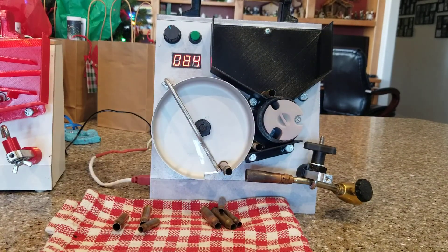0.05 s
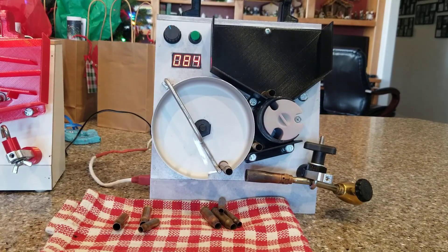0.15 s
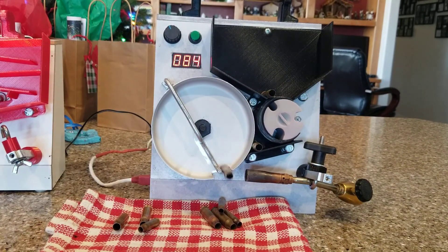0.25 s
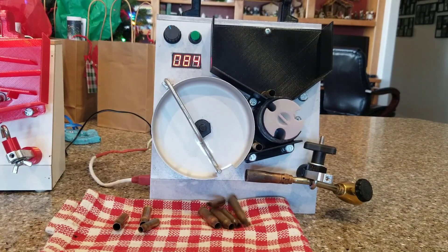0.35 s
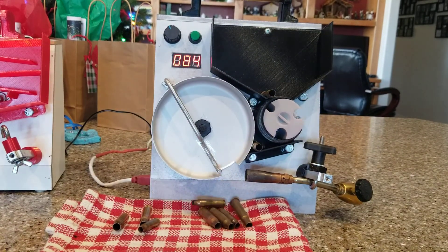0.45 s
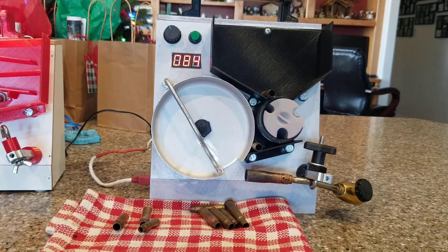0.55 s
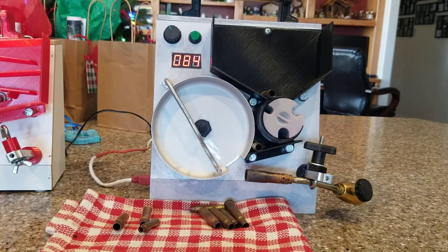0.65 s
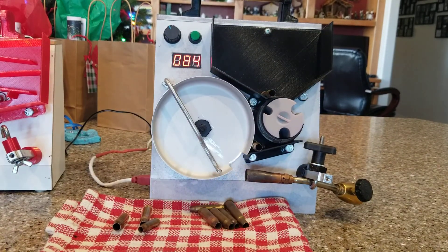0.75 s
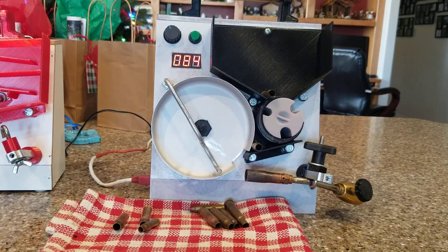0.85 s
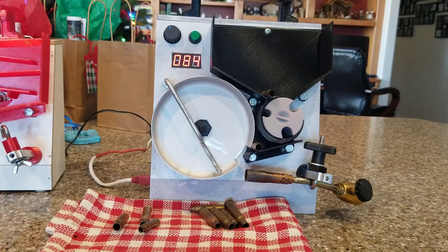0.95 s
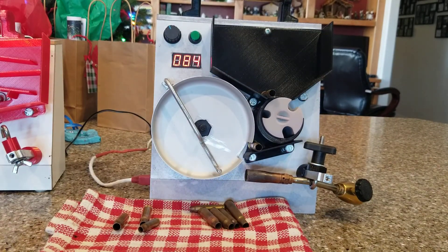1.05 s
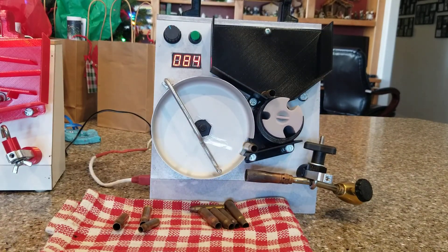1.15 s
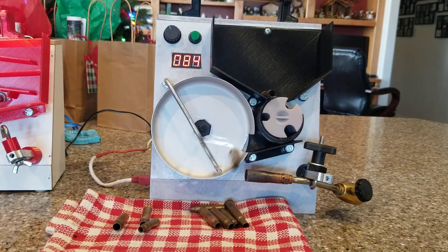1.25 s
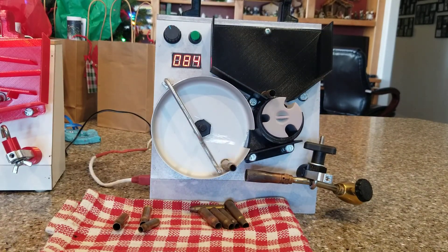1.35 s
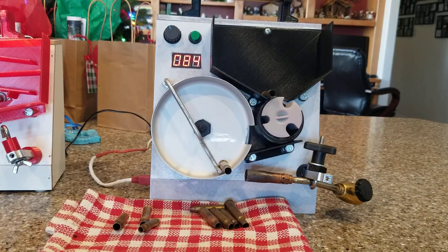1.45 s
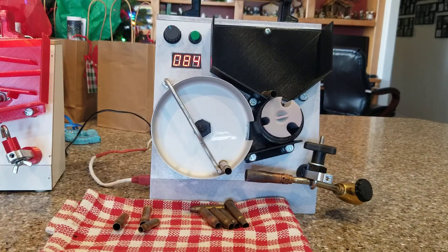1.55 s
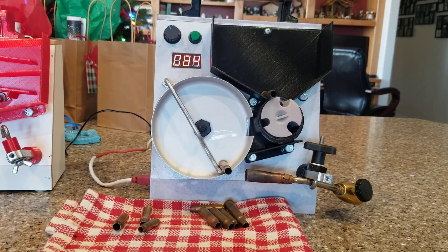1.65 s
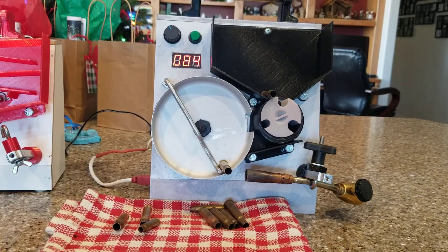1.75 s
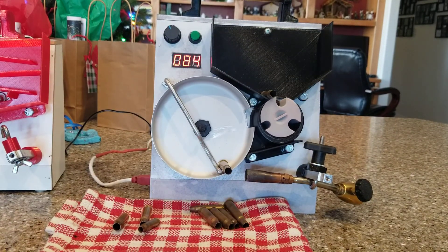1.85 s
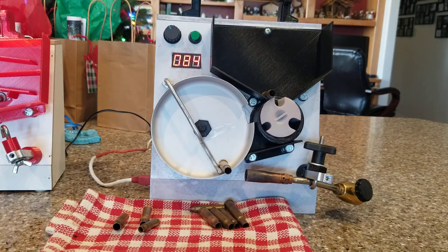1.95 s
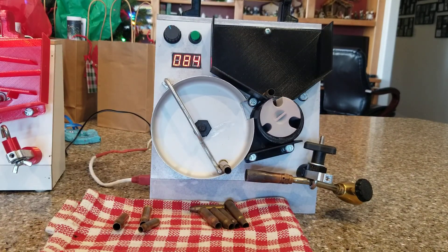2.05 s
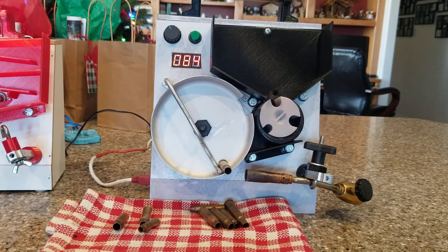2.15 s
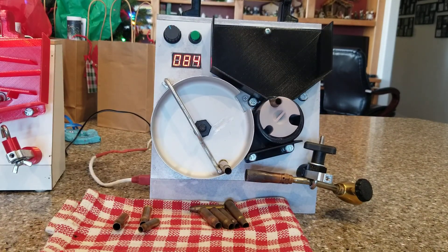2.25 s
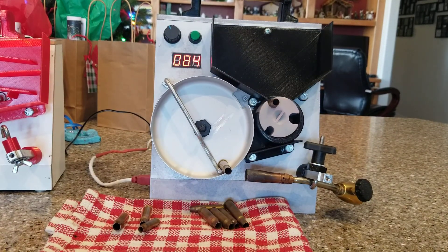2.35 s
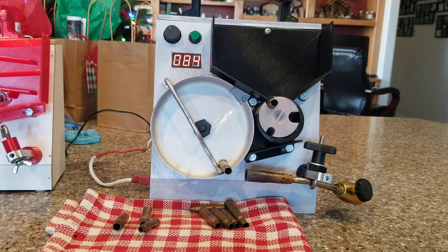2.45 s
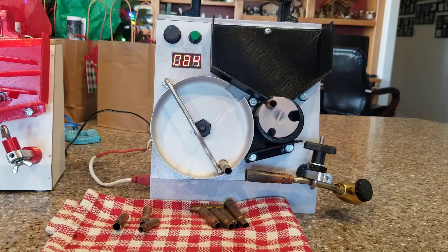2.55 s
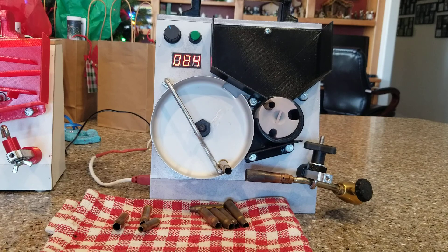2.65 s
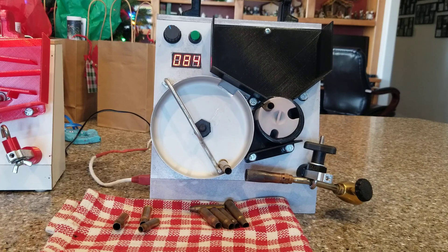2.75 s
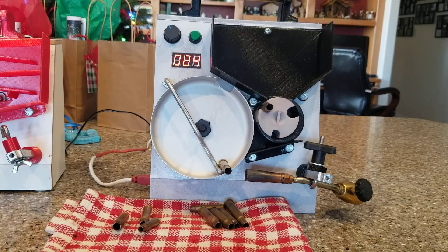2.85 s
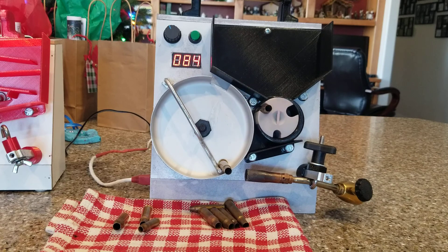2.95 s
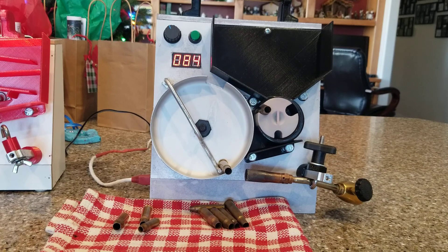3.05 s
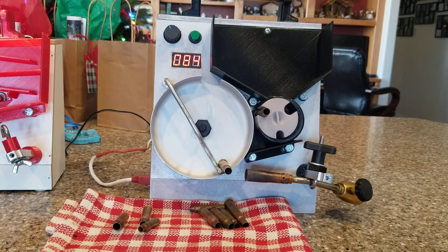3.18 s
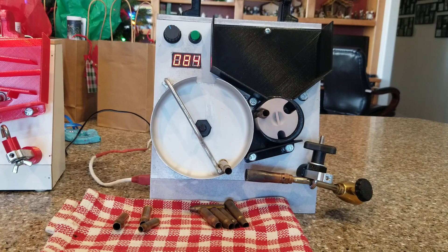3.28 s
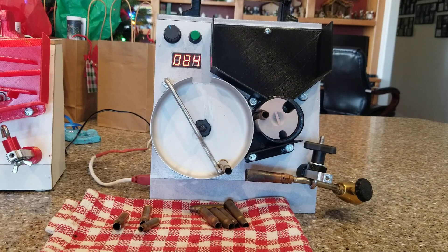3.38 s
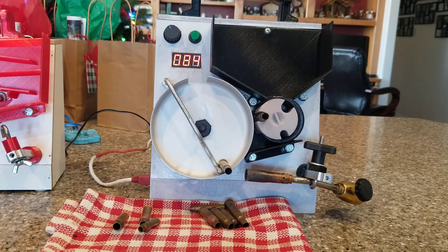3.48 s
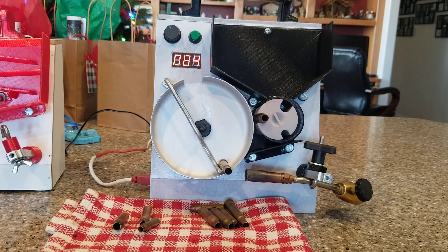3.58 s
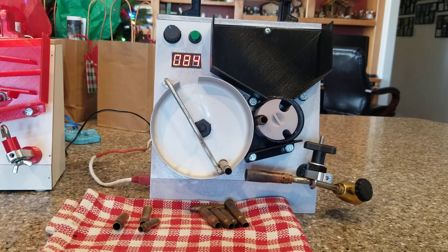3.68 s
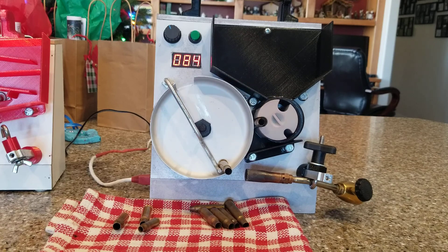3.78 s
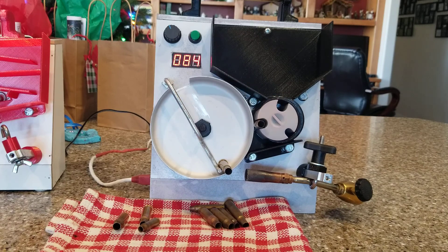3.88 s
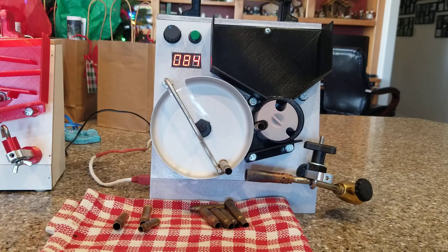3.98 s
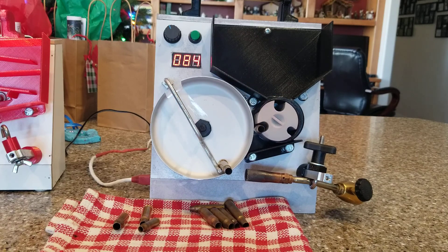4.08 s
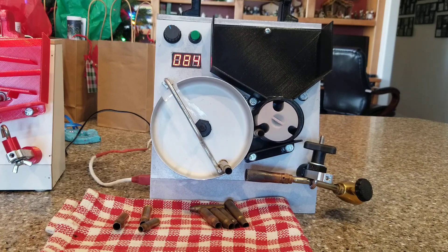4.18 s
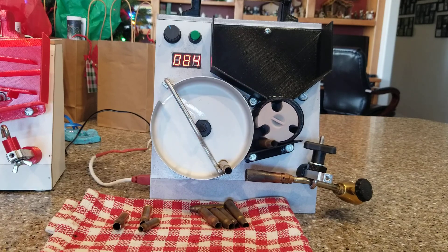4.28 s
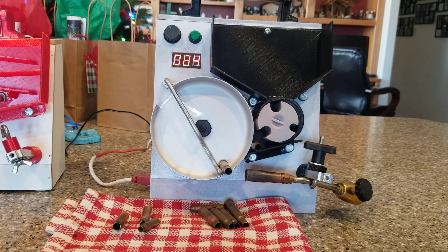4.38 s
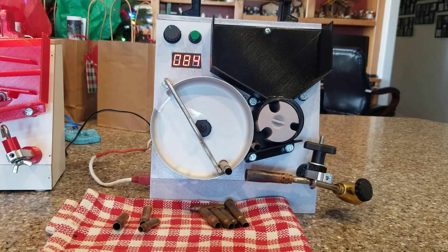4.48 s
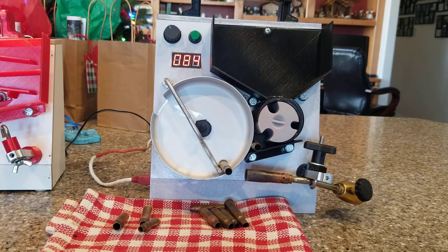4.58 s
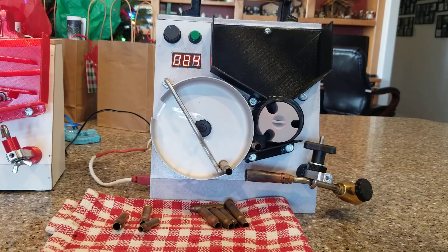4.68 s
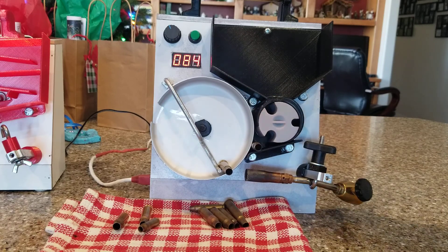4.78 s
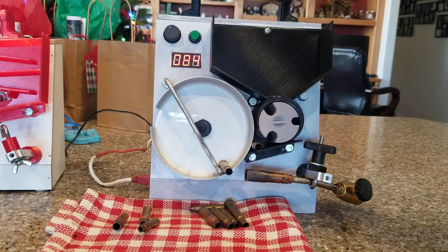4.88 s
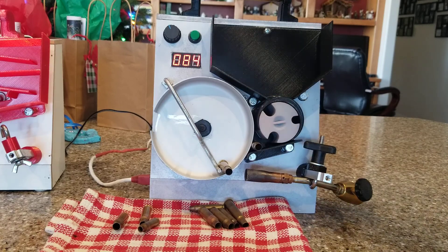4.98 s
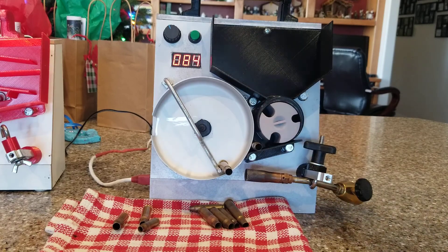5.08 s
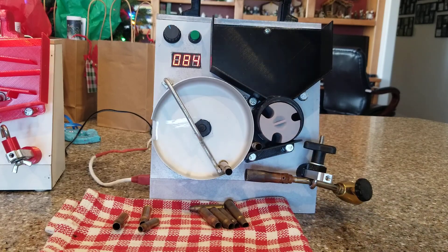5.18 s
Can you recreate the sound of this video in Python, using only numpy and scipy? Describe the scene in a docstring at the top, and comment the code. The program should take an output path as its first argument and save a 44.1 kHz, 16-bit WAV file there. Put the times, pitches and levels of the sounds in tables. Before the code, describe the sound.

A small motorised machine runs on a stone counter in a living room, giving a quiet, slightly uneven gear whir with a thin whine near 1.2 kHz over low rumble. At about 0.3 s an empty brass case lands with a soft thud on a towel and clinks against the pile, very high and bright, with tiny hollow taps by 0.55 s. From 1.1 to 1.45 s another drops with sharp snaps and rattles rapidly in the metal drum, ringing strongly with a brief low boom. The motor's tone shifts slightly; faint rubbing rings follow. Near 2.2 s a lighter click and ting settle in the feed wheel, then a tiny squeak around 2.4 s. Motor alone until a knock at 3.8 s brings soft hiss, followed by a short steel clatter from 4.15 to 4.5 s. Dull bumps and growing rumble close it. Bright sounds lean right; the room reverberates lightly.

```python
"""Case annealer on a counter

A small case annealer runs on a stone counter in a living room: coloured noise and tones make its gear motor,
over a low noise rumble that grows at the end as the phone that hears it is moved. A brass case drops onto a
towel and clinks against the pile; the next rattles into the drum, another settles in the feed wheel. Later
comes a short clatter with a soft hiss. Knocks are shaped bursts of noise, and ringing metal is a set of
fading sines. The bright sounds reach the right microphone far more than the left."""
import sys
import numpy as np
from scipy import signal
from scipy.fft import rfft, irfft, next_fast_len
from scipy.io import wavfile

SR = 44100
rng = np.random.default_rng(int(sys.argv[2]) if len(sys.argv) > 2 else 0)


def persist_wave(psi):
    """Save psi, clipped to +-1, as 16-bit WAV."""
    counts = np.round(np.clip(psi, -1, 1) * 32767).astype(np.int16)
    wavfile.write(sys.argv[1], SR, np.atleast_2d(counts).T)


N = 230591
TIME = np.arange(N) / SR


def from_db(db):
    """Turn decibels into a gain."""
    return 10 ** (np.asarray(db) / 20)


def rms_one(x):
    """Scale a sound to an rms level of 1."""
    return x / np.sqrt(np.mean(x ** 2) + 1e-20)


def at_hz(points, hz):
    """Read a (frequency, value) table on a log-frequency axis."""
    table_hz, values = np.transpose(points)
    return np.interp(np.log(hz), np.log(table_hz), values)


def fading(t, t60):
    """Exponential decay that loses 60 dB in t60 seconds."""
    return np.exp(-np.log(1000) * t / max(t60, 1e-3))


def swell(start, attack_s, end, t60):
    """An envelope that rises from start, holds until end, then dies away."""
    rise = np.clip((TIME - start) / max(attack_s, 1e-3), 0, 1)
    return rise * fading(np.maximum(TIME - end, 0), t60)


def wander(per_s, t):
    """A random curve, with per_s random points a second joined by straight lines."""
    knots = rng.standard_normal(int(t[-1] * per_s) + 2)
    return np.interp(t * per_s, np.arange(len(knots)), knots)


def band(x, low_hz, high_hz, order=2):
    """Keep only the sound between two frequencies."""
    edges = [low_hz, min(high_hz, .48 * SR)]
    return signal.sosfilt(signal.butter(order, edges, "band", fs=SR, output="sos"), x + 1e-18)


def resonate(x, hz, width):
    """A resonance at hz, with gain close to 1 on top and a width in Hz."""
    r = np.exp(-np.pi * width / SR)
    feed = np.array([1, 0, -1]) * (1 - r * r) / 2
    feedback = [1, -2 * r * np.cos(2 * np.pi * hz / SR), r * r]
    return signal.lfilter(feed, feedback, x + 1e-18)


def add(track, s, sound):
    """Mix a sound into a track at a time in seconds."""
    start = int(s * SR)
    track[start:start + len(sound)] += sound[:N - start]


def colour(x, gain):
    """Apply a gain that is a function of frequency."""
    size = next_fast_len(N)
    hz = np.maximum(np.arange(size // 2 + 1) * SR / size, 1)
    return irfft(rfft(x, size) * gain(hz), size)[..., :N]


def shaded(pair, shade):
    """Give the left microphone its own tone, and let it hear 0.1 ms later than the right."""
    left = colour(pair[0], lambda hz: from_db(at_hz(shade, hz)) * np.exp(-2j * np.pi * hz * 1e-4))
    return np.array([left, pair[1]])


def steady_noise(spectrum):
    """Coloured stereo noise, most alike at both microphones in the bass; rms 1."""
    # left-right likeness, with values below zero treated as zero: (frequency [Hz], correlation [-1 to 1])
    likeness = [(60, 0.95), (180, 0.65), (550, 0.15), (1650, -0.23), (4970, -0.07), (15000, -0.27)]

    def alike(hz):
        """Likeness at a frequency, kept between 0 and 0.99."""
        return np.clip(at_hz(likeness, hz), 0, .99)

    mid, side = rng.standard_normal((2, N))
    mid = colour(mid, lambda hz: from_db(at_hz(spectrum, hz)) * np.sqrt(1 + alike(hz)))
    side = colour(side, lambda hz: from_db(at_hz(spectrum, hz)) * np.sqrt(1 - alike(hz)))
    return rms_one(np.array([mid + side, mid - side]))


def room(x, wet_db, early_db, left_direct_db, shared_below_hz=700):
    """Direct sound, quick reflections off counter and panels, then the room's tail; the bass is mostly shared."""
    # how long the room rings: (frequency [Hz], time to lose 60 dB [s])
    room_t60 = [(100, 0.48), (500, 0.56), (3000, 0.61), (8000, .42), (15000, 0.13)]
    early_t60 = .09  # s
    t = TIME[:SR * 3 // 5]
    edges = np.geomspace(50, 20000, 10)
    response = np.zeros((2, len(t)))
    for low, high in zip(edges, edges[1:]):
        hz = np.sqrt(low * high)
        own = 1 / (1 + (shared_below_hz / hz) ** 2)  # share of power that differs between the sides
        noise = np.sqrt(own) * rng.standard_normal((2, len(t)))
        noise += np.sqrt(1 - own) * rng.standard_normal(len(t))
        decay = from_db(wet_db) * rms_one(fading(t, at_hz(room_t60, hz)))
        decay += from_db(early_db) * rms_one(fading(t, early_t60))
        # reflections start 2 ms after the direct sound
        response += band(noise * decay * (t > .002), low, high) / np.sqrt(len(t))
    direct = x * from_db([[left_direct_db], [0]])
    return direct + signal.fftconvolve(x[None], response, axes=1)[:, :N]


def motor_and_rumble(waver=0.0016, flutter_db=1.06, shift_s=1.5):
    """Gear noise, whine and tones of the motor, over a low rumble that grows as the phone is moved.

    The tones shift about 1.5 s, soon after the case drops into the drum."""
    # colours of the gear noise and of the rumble: (frequency [Hz], relative density [dB per Hz])
    running_spectrum = [(100, -37.5), (160, -14.5), (270, -12.5), (370, 0), (480, -6.5), (700, -3.5),
                        (950, -10), (1300, -8), (2100, -12.5), (3000, -29), (4200, -21.5), (6500, -31.5),
                        (9000, -27.5), (11500, -23.5), (16000, -28.5)]
    rumble_spectrum = [(20, -25.5), (45, -8), (75, -2.5), (115, -1.5), (160, -11), (230, -7), (400, -28.5),
                       (1500, -77.5)]
    # motor speed, as the pitch of the gear whine: (time [s], frequency [Hz])
    speed = [(1.1, 1179), (2.6, 1228), (3.1, 1242), (4.1, 1248), (4.7, 1214)]
    # motor tones, each filtered twice, before and after the shift:
    # (frequency [Hz], width of each filter [Hz], level before [dB], level after [dB])
    hum = [(328.96, 19, -78, -66), (474.3, 14, -69, -71), (862, 14, -84, -71.5), (1860, 32, -76.5, -88),
           (2966, 460, -76, -71.5), (1900, 170, -77, -76.5)]
    gears_db, rumble_start_db, base_whine_db = -60.5, -71, -72
    rumble_grows_s, rumble_db_per_s = 4.7, 13  # the phone is moved towards the end
    panel_hz, panel_width_hz, panel_lift_db = 1246, 9, 9  # the whine grows near a resonance of the panel

    rumble_db = rumble_start_db + rumble_db_per_s * np.maximum(TIME - rumble_grows_s, 0)
    out = from_db(gears_db) * steady_noise(running_spectrum)
    out += from_db(rumble_db) * steady_noise(rumble_spectrum)

    pitch = np.interp(TIME, *np.transpose(speed))
    whine_db = base_whine_db + panel_lift_db / (1 + ((pitch - panel_hz) / panel_width_hz) ** 2)
    wobble = rms_one(band(rng.standard_normal(N), 12, 40))
    turns = np.cumsum(pitch * (1 + waver * wobble)) / SR
    out += from_db(whine_db) * np.sqrt(2) * np.sin(2 * np.pi * turns)
    # the teeth mesh unevenly; the rumble flutters along with the gears
    out *= from_db(flutter_db * rms_one(band(rng.standard_normal(N), 8, 60)))

    shifted = np.clip((TIME - shift_s) * 2 + .5, 0, 1)  # a half-second change centred on shift_s
    for hz, width, before_db, after_db in hum:
        tone = resonate(resonate(rng.standard_normal(N), hz, width), hz, width)
        throb_db = 2.5 * rms_one(band(rng.standard_normal(N), 4, 16))
        level_db = before_db + (after_db - before_db) * shifted
        out += from_db(level_db) * rms_one(tone * from_db(throb_db))
    return out


def hiss(flutter_db=0.5):
    """Bright noise that surges, flutters a little and slowly ebbs."""
    # surges of soft hiss around the clatter: (time [s], level [dB], attack [s], time to lose 60 dB [s])
    surges = [(3.79, -51, 0.01, 2.3), (4.068, -51.5, 0.044, 9.3)]
    # colour of the hiss: (frequency [Hz], relative density [dB per Hz])
    hiss_spectrum = [(250, -3), (380, 9), (900, 0.5), (2000, 2), (4000, -5), (7000, -9), (10000, -10.5),
                     (13000, 0), (16000, -12)]
    level = sum(from_db(db) * swell(s, attack_s, s + attack_s, t60) for s, db, attack_s, t60 in surges)
    return level * from_db(flutter_db * wander(30, TIME)) * steady_noise(hiss_spectrum)


def bumps(t60=0.2):
    """Soft shoves through the counter reach the microphones as a short low rumble."""
    # dull bumps: (time [s], level before the fade [dB])
    shoves = [(0.07, -55), (4.102, -75), (4.605, -52), (4.638, -56), (4.892, -59), (5.07, -48.5),
              (5.142, -58), (5.19, -53)]
    t, out = TIME[:SR // 3], np.zeros(N)
    for s, db in shoves:
        rumble = band(rng.standard_normal(len(t)), 37, 97)
        rumble += from_db(-5.5) * band(rng.standard_normal(len(t)), 118, 280)
        add(out, s, from_db(db) * rms_one(rumble) * fading(t, t60))
    return out


def boom():
    """Two low modes of the drum swell while the case rocks in it."""
    # low modes of the drum: (frequency [Hz], level [dB], attack [s], time to lose 60 dB [s])
    boom_modes = [(92.6, -41, .045, 0.18), (321, -43, 0.0094, 0.42)]
    rock_start_s, rock_end_s = 1.302, 1.435
    out = np.zeros(N)
    for hz, db, attack_s, t60 in boom_modes:
        envelope = swell(rock_start_s, attack_s, rock_end_s, t60)
        out += np.sqrt(2) * from_db(db) * envelope * np.sin(2 * np.pi * hz * TIME)
    return out


def rubs(attack_s=0.01442, t60=.25, hz=4156, width_hz=25):
    """The case rubs on the turning drum: friction keeps one mode of it faintly ringing."""
    # rubs: (time [s], level [dB], length [s])
    rub_times = [(1.801, -83, 0.088), (1.99, -74.5, .1), (2.108, -66, .06), (2.46, -78.5, 0.052)]
    level = sum(from_db(db) * swell(s, attack_s, s + length, t60) for s, db, length in rub_times)
    return level * rms_one(resonate(rng.standard_normal(N), hz, width_hz))


def squeaks(start_hz=13800, end_hz=10800):
    """Brass slips on the feed wheel with a tiny falling chirp, roughened by noise."""
    # squeaks: (time [s], level [dB], length [s])
    slips = [(2.431, -47.5, 0.01), (2.538, -58.5, 0.0031), (2.576, -61, 0.0036)]
    out = np.zeros(N)
    for s, db, length in slips:
        t = TIME[:int(length * SR)]
        chirp = signal.chirp(t, start_hz, length, end_hz) + 0.38 * rng.standard_normal(len(t))
        add(out, s, from_db(db) * np.hanning(len(t)) * chirp)
    return band(out, 8900, 16000)


def hollow_taps(hz=1700, t60=0.0395):
    """Light taps sound the air inside an empty case, which is a short stopped pipe."""
    # taps: (time [s], level [dB])
    taps = [(0.513, -50), (0.543, -44.5), (0.561, -53)]
    t, out = TIME[:SR // 5], np.zeros(N)
    for s, db in taps:
        add(out, s, from_db(db) * np.sin(2 * np.pi * hz * t) * fading(t, t60))
    return out


def thuds(contact_s=0.0008, ring_db=7.5):
    """The towel softens the landing to one smooth push; the counter top answers briefly."""
    # cases landing softly on the towel: (time [s], level of the push [dB])
    landings = [(0.2905, -21.5), (1.113, -44), (1.141, -37), (1.155, -43.5)]
    push, t = np.zeros(N), TIME[:SR // 100]
    for s, db in landings:
        add(push, s, from_db(db) * np.sin(np.pi * np.minimum(t / contact_s, 1)) ** 2)
    knock = from_db(4) * band(push, 420, 1400)
    counter = sum(resonate(knock, hz, 35) for hz in (417.0, 514.3, 692.0, 803.0))
    return knock + from_db(ring_db) * counter


def snaps(t60=0.0113, low_hz=1100):
    """Metal meets a hard stop: a bright broadband crack, gone in about a hundredth of a second."""
    # sharp snaps: (time [s], level before filtering [dB])
    stops = [(1.1997, -23.5), (1.2647, -20.5), (2.226, -31.5), (4.2872, -24.5), (4.3655, -38),
             (4.492, -29.5)]
    t, out = TIME[:SR // 20], np.zeros(N)
    for s, db in stops:
        add(out, s, from_db(db) * rng.standard_normal(len(t)) * fading(t, t60))
    return band(out, low_hz, 16000) + band(out, 1500, 6800)


def touches(count=3, rebound_s=.021, rebound_softens_db=3):
    """Each blow rebounds, softer every time: yields time, level, hardness, knock Hz and clack Hz."""
    # blows on the machine: (time [s], level [dB], hardness [dB], knock centre [Hz], clack centre [Hz],
    # loss per rebound [dB])
    blow_table = [(1.2005, -30, 11.5, 595, 5400, 8.5), (1.2078, -30, 9, 404, 2150, 12),
                  (1.247, -32, 5, 680, 1620, 2), (1.2635, -24.5, 6.5, 690, 1860, 1),
                  (1.2884, -29.5, 0, 680, 2020, 7), (1.309, -25.5, -3, 420, 2190, 9),
                  (1.3323, -28.5, 6.5, 403, 1400, 8), (1.3885, -29, 2.5, 571, 1201, 2.5),
                  (1.4225, -37, -3, 380.5, 1900, 5), (2.1813, -31.5, -9.5, 422, 1795, 8.5),
                  (2.2268, -34, -4.5, 333, 1840, 10), (3.7954, -36.5, 8, 600, 1400, 6),
                  (4.148, -40.5, 5.5, 556, 1140, 9), (4.2359, -35.5, -1.5, 653, 1210, 7),
                  (4.248, -29.5, -1, 680, 1510, 5), (4.2861, -22, -4, 667, 1360, 10),
                  (4.3665, -37, 9.5, 560, 1200, 6), (4.385, -29, -1.5, 367, 2510, 6.5),
                  (4.4924, -34.5, 8, 756, 1180, 14)]
    for s, db, hardness_db, knock_hz, clack_hz, loss_db in blow_table:
        for k, uneven in enumerate(rng.standard_normal(count)):
            touch_s = s + k * rebound_s * (1 + .06 * uneven)
            yield touch_s, db - k * loss_db, hardness_db - k * rebound_softens_db, knock_hz, clack_hz


def blows(tick_db=-8, knock_db=7, low_db=-4, clack_db=4.5, crack_db=6, crack_t60=0.0074, chatter_t60=.068,
          grain_db=4, knock_spread=1.62, clack_spread=1.6, knock_loss_per_db=.5):
    """Each touch is a crack and a chatter of tiny contacts, coloured by hardness and housing resonances."""
    # resonances of the housing: (frequency [Hz], width [Hz], level [dB])
    housing_modes = [(94, 15, 7.5), (205, 45, -1), (344.2, 18, 13), (432.6, 40.1, -1), (533.8, 30, -1.5),
                     (722, 34, 8), (830.5, 9.8, 8.5), (1217, 73, 6.5), (1474.3, 70, 1), (2030, 85, -0.5),
                     (2922, 70, 3), (4156, 250, -9), (5612, 370, -3.5)]
    t = TIME[:SR // 4]
    tick, body = np.zeros((2, N))
    for s, db, hardness_db, knock_hz, clack_hz in touches():
        noise, grains = rng.standard_normal((2, len(t)))
        envelope = from_db(crack_db) * fading(t, crack_t60) + fading(t, chatter_t60)
        force = rms_one(noise * from_db(grain_db * grains)) * envelope
        knock = from_db(knock_db) * band(force, knock_hz / knock_spread, knock_hz * knock_spread)
        knock += from_db(low_db) * band(force, 70, 200)
        clack = from_db(clack_db) * band(force, clack_hz / clack_spread, clack_hz * clack_spread)
        # a harder touch ticks more and knocks less
        add(tick, s, from_db(db + tick_db + hardness_db) * force)
        add(body, s, from_db(db - knock_loss_per_db * hardness_db) * knock + from_db(db) * clack)
    housing = sum(from_db(db) * resonate(body, hz, width) for hz, width, db in housing_modes)
    bright = band(tick, 9300, 15000, order=3) + from_db(0.5) * band(tick, 3300, 5400)
    return from_db(-3.5) * body + housing + bright


def ringing_metal(clinks, modes, contact_db, contact_t60, swing_db=2.0, phase_wander=0.74, pivot_hz=11000):
    """A touch makes a brief contact hiss and feeds energy into each ringing mode."""
    start, end = clinks[0][0], clinks[-1][0]
    t, short = TIME[:int((end - start + .5) * SR)], TIME[:SR // 2]
    out, contact = np.zeros((2, N))
    for hz, mode_db, t60 in modes:
        energy = np.zeros(len(t) + SR)
        decay = fading(short, t60) ** 2
        for s, level_db, tilt_db in clinks:
            hit_db = level_db + mode_db + tilt_db * np.log2(hz / pivot_hz)
            add(energy, s - start, from_db(hit_db) ** 2 * decay)
        # the part turns as it rings, so each mode swells and fades on its own
        swing, phase = wander(45, t), wander(70, t)
        tone = np.sin(2 * np.pi * hz * t + phase_wander * phase)
        add(out, start, np.sqrt(energy[:len(t)]) * from_db(swing_db * swing) * tone)
    for s, level_db, _ in clinks:
        burst = rng.standard_normal(len(short)) * fading(short, contact_t60)
        add(contact, s, from_db(level_db + contact_db) * burst)
    return out + band(contact, 8200, 11000) + from_db(-15.5) * band(contact, 2500, 4900)


def steel_rings():
    """A steel part of the machine jangles in the clatter."""
    # clinks: (time [s], level [dB], tilt [dB per octave])
    steel_clinks = [(3.795, -34, 6.5), (4.287, -47, 2), (4.368, -32, 4.5), (4.386, -41, 6),
                    (4.402, -29.5, 13), (4.492, -47, 8)]
    # ring of the part: (frequency [Hz], level [dB], time to lose 60 dB [s])
    steel_modes = [(1240, -2, .14), (1340, -2, .12), (2075, -3, .12), (2600, -5, .13), (2953, -2, .12),
                   (3490, -7, .1), (3919, -6, .15), (4434, -5, .13), (5450, -8, .11), (6191, -7, .11),
                   (8370, -11, .13), (13400, -11, .1)]
    return ringing_metal(steel_clinks, steel_modes, contact_db=-9, contact_t60=0.02112)


def feed_rings():
    """A brass case rings as it settles in the feed wheel."""
    # clinks: (time [s], level [dB], tilt [dB per octave])
    feed_clinks = [(2.182, -43, 11.5), (2.226, -42, -2)]
    # ring of the case there: (frequency [Hz], level [dB], time to lose 60 dB [s])
    feed_modes = [(2584, -20, .12), (8441, 0, .22), (8893, -11, .12), (11210, -2, .19), (14600, -11, .13)]
    return ringing_metal(feed_clinks, feed_modes, contact_db=15, contact_t60=.015)


def pile_rings():
    """Brass clinks on brass in the pile."""
    # clinks: (time [s], level [dB], tilt [dB per octave])
    pile_clinks = [(0.3225, -19.5, 1), (0.334, -21, 8), (0.372, -24.5, -5), (0.407, -31, 8),
                   (0.427, -38, 6), (0.447, -31.5, 6), (0.512, -36, 40), (0.545, -47, 2)]
    # ring of the cases there: (frequency [Hz], level [dB], time to lose 60 dB [s])
    pile_modes = [(7860, -5, .28), (9970, -13, .12), (10340, -3.5, .2), (11435, -12, .33), (11470, -6, .32),
                  (12530, -15, .1), (12840, -15, .24), (13600, -9, .14), (15280, -1, .135),
                  (15460, -11, .17)]
    return ringing_metal(pile_clinks, pile_modes, contact_db=-5.5, contact_t60=0.107)


def drum_rings():
    """A brass case rings as it bounces in the drum."""
    # clinks: (time [s], level [dB], tilt [dB per octave])
    drum_clinks = [(1.200, -35.5, -0.5), (1.264, -40, 0.5), (1.289, -15, -6), (1.310, -9, 2.5),
                   (1.333, -19, 0.5), (1.353, -16.5, 7.5), (1.372, -16, 4.5), (1.390, -20, -4),
                   (1.423, -19.5, -6.5), (1.433, -20, 2)]
    # ring of the case there: (frequency [Hz], level [dB], time to lose 60 dB [s])
    drum_modes = [(2864, -21.5, .23), (3171, -35, .18), (4156, -23.5, .27), (8290, -20, .1),
                  (9184, -16, .06), (10070, -16, .25), (10450, -4.3, .22), (10720, -18, .14),
                  (11930, -23, .11), (12520, -25, .09), (13560, -24, .26), (15480, -22, .1)]
    return ringing_metal(drum_clinks, drum_modes, contact_db=-1.0, contact_t60=.03)


def scene():
    """Blows, ringing metal and hiss, brighter on the right, over the running motor and the rumble."""
    # left microphone relative to right, for the handling sounds and for the motor with the rumble:
    # (frequency [Hz], level [dB])
    near_shade = [(90, 4), (350, 2.5), (700, -4.5), (1400, -2.5), (2400, -6.5), (4500, -13.5), (8000, -27),
                  (11000, -15.5), (15000, -21)]
    motor_shade = [(90, 5), (380, 0), (700, -6), (1290, -8.5), (2380, 5), (4400, -15.5), (8000, -13.5),
                   (15000, 0.5)]
    rings = steel_rings() + feed_rings() + pile_rings() + drum_rings()
    knocks = blows() + snaps() + thuds() + squeaks() + hollow_taps()
    near = room(knocks, wet_db=-8, early_db=-5.0, left_direct_db=-5.5)
    near += room(rings + rubs(), wet_db=-14.5, early_db=-6, left_direct_db=-3)
    near += boom() + bumps()
    return shaded(near + hiss(), near_shade) + shaded(motor_and_rumble(), motor_shade)


def record(dry):
    """The top is cut steeply above 15750 Hz."""
    return signal.sosfilt(signal.ellip(10, .3, 80, 15750, fs=SR, output="sos"), dry)


dry = scene()
out = record(dry)
persist_wave(out)
```